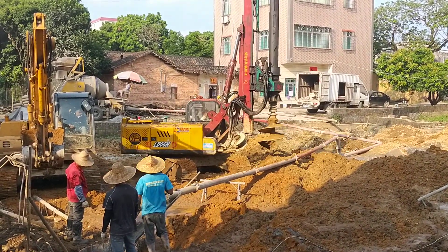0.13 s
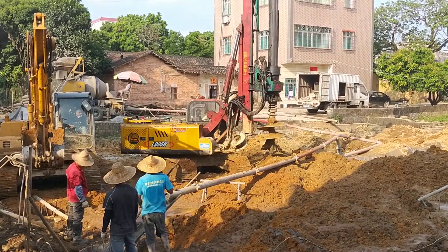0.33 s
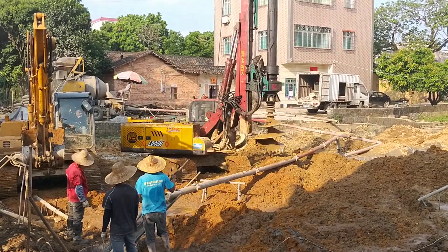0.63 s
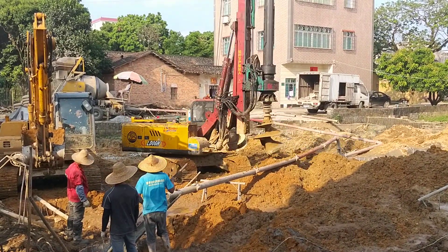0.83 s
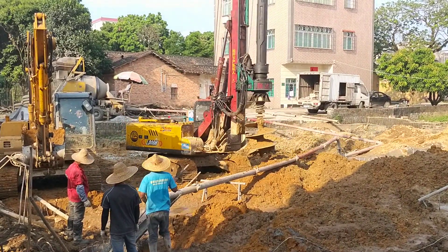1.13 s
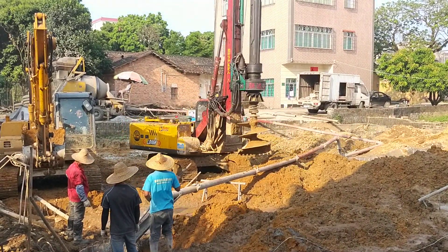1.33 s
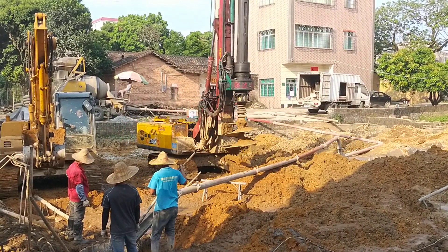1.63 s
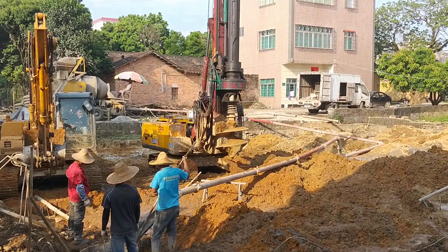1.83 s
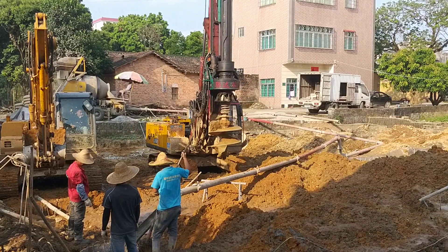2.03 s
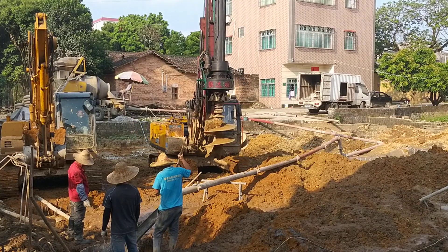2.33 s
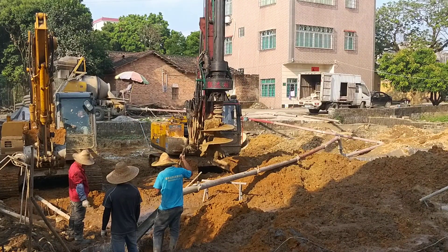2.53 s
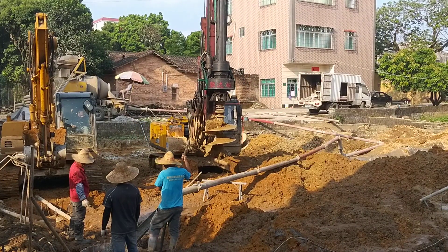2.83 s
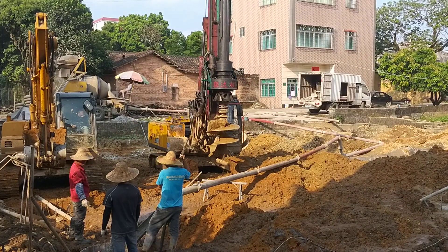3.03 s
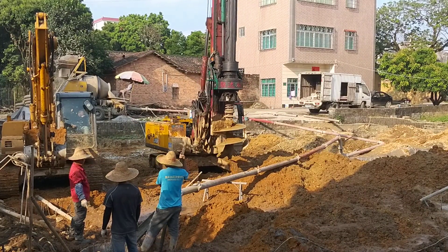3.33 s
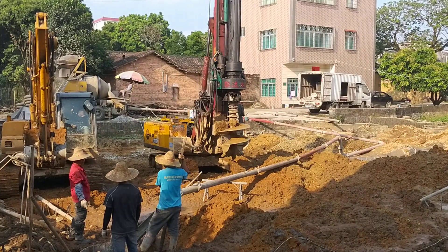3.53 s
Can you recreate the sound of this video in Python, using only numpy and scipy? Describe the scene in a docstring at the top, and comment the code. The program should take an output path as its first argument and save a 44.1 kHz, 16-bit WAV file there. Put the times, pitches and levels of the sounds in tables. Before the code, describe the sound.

Steady diesel rumble, pump hum and fan hiss of a turning drill rig outdoors, with early clatter and panel knocks, a calmer middle, then heavy clanks, grit crunches and low wind buffets at the microphone.

```python
"""Rotary drilling rig on a building site

A rig swings round on an open site. Diesel firings drive noise through the resonances of its housing,
and the pump hums in harmonics of the crank rate; exhaust, fan, engine bay and an idling machine join in.
Mast and drill string shudder, rattle and clank in bursts of filtered noise and decaying modes; a panel
knocks, fittings clink, paired sines make dull thumps and low buffets of wind, hydraulics groan,
steel squeaks, and grit crunches in clouds of grains.
"""
import sys
import numpy as np
from scipy import signal
from scipy.fft import rfft, irfft, next_fast_len
from scipy.io import wavfile

SR = 44100
rng = np.random.default_rng(int(sys.argv[2]) if len(sys.argv) > 2 else 0)


def master_out(mix):
    """Clip the mix to full scale and print it as 16-bit PCM to the path in sys.argv[1]."""
    frames = np.transpose(np.atleast_2d(mix))
    ceiling = np.clip(frames, -1, 1)
    pcm = np.round(ceiling * 32767).astype(np.int16)
    wavfile.write(sys.argv[1], SR, pcm)


N = 163170
T = np.arange(N) / SR


def from_db(db):
    """Logarithmic level: decibels to amplitude gain."""
    return 10 ** (np.asarray(db) / 20)


def rms_one(x):
    """Normalisation: scale to unit rms."""
    return x / np.sqrt(np.mean(x ** 2) + 1e-20)


def pan(db):
    """Interaural level difference: left and right gains for left minus right in dB."""
    return from_db(np.array([[db], [-db]]) / 2)


def level(rows):
    """Amplitude envelope: gain interpolated in dB between (t/s, level/dB) points."""
    return from_db(np.interp(T, *np.transpose(rows)))


def at_hz(points, hz):
    """Spectral interpolation: read a table on a log-frequency axis."""
    f, v = np.transpose(points)
    return np.interp(np.log(hz), np.log(f), v)


def drift(rate):
    """Low-passed random process: unit-rms wander with its corner near rate in Hz."""
    step = 40  # samples between the points of the wander
    r = np.exp(-2 * np.pi * rate * step / SR)
    settle = 2000
    noise = rng.standard_normal(N // step + settle + 2)
    slow = signal.lfilter([1], [1, -2 * r, r * r], noise)[settle:]
    return np.interp(np.arange(N) / step, np.arange(len(slow)), rms_one(slow))


def band(x, low, high):
    """Band-pass filtering with Butterworth slopes."""
    edges = [max(low, 10), min(high, SR / 2 - 100)]
    return signal.sosfilt(signal.butter(2, edges, "band", fs=SR, output="sos"), x)


def around(x, hz, width):
    """Band-pass filtering about a centre, width in Hz."""
    return band(x, hz - width / 2, hz + width / 2)


def stereo(pair, alike):
    """Interchannel correlation: mix two unrelated signals as sum and difference."""
    c = np.clip(alike, -.99, .99)
    return np.sqrt(1 + c) * pair[0] + np.sqrt(1 - c) * pair[1] * np.array([[1], [-1]])


# left-right likeness of the site's sound: (f/Hz, correlation)
LIKENESS = [(50, 0.93), (200, 0.97), (500, 0.95), (1000, 0.72), (2000, 0.43), (4000, -0.25), (8000, 0.01),
            (15000, -0.16)]


def likeness(hz):
    """Spatial coherence: left-right correlation as a function of frequency."""
    return at_hz(LIKENESS, hz)


def coloured(spectrum, excitation=1, patchy_db=0):
    """Subtractive synthesis: enveloped noise through a bank of flickering bands; rms 1."""
    edges = np.geomspace(spectrum[0][0], spectrum[-1][0], 2 * len(spectrum) + 1)
    white = rng.standard_normal((2, 2, N)) * excitation
    out = 0
    for k, (low, high) in enumerate(zip(edges, edges[1:])):
        hz = np.sqrt(low * high)
        gain = from_db(at_hz(spectrum, hz) + patchy_db * drift(15.4))
        # neighbouring bands draw on different noise
        out = out + gain * stereo(band(white[k % 2], low, high), likeness(hz))
    return rms_one(out)


def contacts(per_s, spread_db, decay_s):
    """Shot noise: amplitude envelope of random contacts whose powers add."""
    strength = from_db(spread_db * np.minimum(rng.exponential(1, N), 3))
    hits = (rng.random(N) < per_s / SR) * strength
    power = signal.lfilter([1], [1, -np.exp(-2 / (decay_s * SR))], hits ** 2 + 1e-12)
    return np.sqrt(rms_one(power))


def bursts(rows, attack_s, release_s):
    """Energy addition of envelopes: linear attack, hold counted from the start, exponential release."""
    power = 0
    for s, hold, db in rows:
        attack = np.clip((T - s) / attack_s, 0, 1)
        release = np.exp(-np.maximum(T - s - hold, 0) / release_s)
        power = power + (from_db(db) * attack * release) ** 2
    return np.sqrt(power)


def blow(s, db, decay_s):
    """Impulsive excitation: sudden onset and exponential decay."""
    return from_db(db) * (T >= s) * np.exp(-np.maximum(T - s, 0) / decay_s)


def ring(x, hz, t60):
    """Damped resonance: one steel mode, a two-pole filter driven by x."""
    r = np.exp(-np.log(1000) / (t60 * SR))
    w = 2 * np.pi * hz / SR
    edge = np.sqrt(1 - r)
    return signal.lfilter([edge, 0, -edge], [1, -2 * r * np.cos(w), r * r], x + 1e-12)


CRANK_HZ, FIRINGS_PER_TURN, SPEED_WOBBLE = 35.3, 3, 0.00299  # mean rate; wobble as a fraction, rms
FIRING_DECAY_S, FIRING_SPREAD_DB, STEADY_SHARE = 0.026, 0.5, 0.8  # share beside pulses of rms 1
# relative strength of the firings in turn: (level/dB)
CYLINDERS_DB = [-1, -0.6, -2.3, -3.6, -2.5, -2.5]


def combustion():
    """Periodic excitation: crank turns so far, and the pulse envelope of the firings."""
    turns = np.cumsum(CRANK_HZ * (1 + SPEED_WOBBLE * drift(2.4))) / SR
    firing = turns * FIRINGS_PER_TURN
    k = firing.astype(int)
    spread = FIRING_SPREAD_DB * rng.standard_normal(N)[k]
    strength = from_db(np.take(CYLINDERS_DB, k, mode="wrap") + spread)
    decay = np.exp(-(firing % 1) / (CRANK_HZ * FIRINGS_PER_TURN * FIRING_DECAY_S))
    return turns, STEADY_SHARE + rms_one(strength * decay)


TURN_MID_S, TURN_TIME_S = 2.26, 0.72


def turning():
    """Directivity weight: a smooth step from -1/2 to 1/2 as the rig turns."""
    return np.tanh((T - TURN_MID_S) / TURN_TIME_S) / 2


HOUSING_FLICKER_DB, HOUSING_FLICKER_HZ = .8, 26
# housing resonances: (f/Hz, width/Hz, relative level/dB, left-right correlation, change over the turn/dB)
HOUSING = [(326, 102, -35.5, 0.87, 0), (568, 110, -36, 0.7, -0.5), (646, 62, -42, 0.6, 1.5),
           (705.4, 71, -35.5, 0.75, -5), (1010, 98, -34, 0.62, 0.5), (1533, 210, -34, 0.3, 1),
           (2002, 225, -38, 0.34, -2.5), (2545, 170, -41, 0.1, -2.5), (3100, 360, -45, 0, -2)]
# level of the engine's drone: (t/s, relative level/dB)
DRONE = [(0, 2), (.9, -0.5), (1.4, 1), (1.9, 2), (2.2, 3.5), (2.39, 1.5), (2.55, 4), (2.85, 0.5), (3.3, 4),
         (3.7, 2.5)]


def housing(puffs):
    """Forced resonance: the firings' noise drives the modes of the engine housing."""
    turned = turning()
    out = 0
    for hz, width, db, alike, change in HOUSING:
        noise = around(rng.standard_normal((2, N)) * puffs, hz, width)
        out = out + from_db(db + change * turned) * rms_one(stereo(noise, alike))
    return level(DRONE) * from_db(HOUSING_FLICKER_DB * drift(HOUSING_FLICKER_HZ)) * out


TONE_WAVER_DB, TONE_WAVER_HZ = 1.6, 4
# orders of the pump's hum: (multiple of the crank rate, mean level/dB, change over the turn/dB)
ORDERS = [(1, -46.5, 1), (2, -46, 1), (3, -50.5, 4), (12, -41.5, 8), (18, -35, -0.5)]


def pump_hum(turns):
    """Harmonic series: the pump's tones lock to multiples of the crank rate."""
    turned = turning()
    out = 0
    for order, db, change in ORDERS:
        tone = rms_one(np.sin(2 * np.pi * (order * turns + rng.random())))
        out = out + from_db(db + change * turned + TONE_WAVER_DB * drift(TONE_WAVER_HZ)) * tone
    return out


EXHAUST_DB, EXHAUST_FLICKER_DB, EXHAUST_FLICKER_HZ = 0.5, 0.5, 6  # first is added to the table's level
# level of the exhaust's rumble: (t/s, relative level/dB)
RUMBLE = [(0.0, -41), (0.3, -42), (1.45, -42), (1.62, -33.5), (1.85, -55), (2.01, -31), (2.2, -33.5),
          (2.6, -35.5), (3.0, -30.5), (3.7, -29.5)]
# its spectrum: (f/Hz, relative level per Hz/dB)
EXHAUST = [(30, -18), (39, -13), (50, 6.5), (74, 6), (110, -3), (170, -7.5), (300, -33), (600, -35)]


def exhaust(puffs):
    """Pulsed-flow noise: each firing swells a low rumble."""
    flicker = from_db(EXHAUST_DB + EXHAUST_FLICKER_DB * drift(EXHAUST_FLICKER_HZ))
    return flicker * level(RUMBLE) * coloured(EXHAUST, puffs, patchy_db=4.0)


# level of the low roar from the engine bay as it swings round: (t/s, level/dB)
ROAR_LEVEL = [(0, -44), (.55, -37.5), (1.0, -34), (1.4, -47.5), (1.65, -41), (1.85, -41), (2.15, -34),
              (2.4, -41.5), (2.55, -34), (2.85, -43.5), (3.3, -36.5), (3.7, -26.5)]
# its spectrum: (f/Hz, relative level per Hz/dB)
ROAR = [(95, 7), (150, 1), (200, 10), (280, 4.5), (380, -3.5), (460, 2.5), (560, 6.5), (800, 10.5)]


def roar(puffs):
    """Amplitude-modulated noise: the engine bay roars low in time with the firings."""
    return level(ROAR_LEVEL) * coloured(ROAR, puffs, patchy_db=5.0)


FAN_DB, FAN_STEADY_SHARE = -36.5, 5.3  # base level; steady part added to the firing envelope
# level of the fan's hiss: (t/s, level above base/dB)
FAN_SWELL = [(0, 6), (.65, 1.5), (1.1, 2.5), (1.7, 1), (2.3, 4), (2.9, 5), (3.7, 3)]
# its spectrum: (f/Hz, relative level per Hz/dB)
FAN = [(100, -1), (250, -17), (480, -10.5), (850, -26), (1200, -4.5), (2300, -8), (3600, -7), (5300, -6.5),
       (6500, -14.5), (8100, -55), (9700, -17.5), (12000, -39), (15500, -19.5)]


def fan(puffs):
    """Broadband flow noise: a mostly steady hiss, lightly modulated by the firings."""
    return from_db(FAN_DB) * level(FAN_SWELL) * coloured(FAN, FAN_STEADY_SHARE + puffs, patchy_db=2.0)


def engine():
    """Superposition: one crank drives housing, pump, exhaust, engine bay and fan."""
    turns, puffs = combustion()
    return housing(puffs) + pump_hum(turns) + exhaust(puffs) + roar(puffs) + fan(puffs)


TAPPETS_DB, TAPPET_LOW_HZ, TAPPET_HIGH_HZ = -45.5, 3900, 5100
TAPPETS_PER_S, TAPPET_SPREAD_DB, TAPPET_DECAY_S = 140, 2.5, .003


def tappets():
    """Band-limited shot noise: fine, random ticking of the valve gear."""
    ticks = rng.standard_normal((2, N)) * contacts(TAPPETS_PER_S, TAPPET_SPREAD_DB, TAPPET_DECAY_S)
    return from_db(TAPPETS_DB) * rms_one(band(ticks, TAPPET_LOW_HZ, TAPPET_HIGH_HZ))


# a second machine idles nearby: (f/Hz, level/dB)
IDLER = [(80.7, -51)]


def idler():
    """Pure tone with phase wander: the second machine's low drone."""
    return sum(from_db(db) * rms_one(np.sin(2 * np.pi * hz * T + drift(1.0))) for hz, db in IDLER)


SHUDDER_ATTACK_S, SHUDDER_RELEASE_S = 0.0052, 0.049
# mast and drill string shudder: (start t/s, hold/s, level/dB, centre f/Hz, width/octaves)
SHUDDERS = [(-.03, 0.28, -23, 260, 1.55), (0.225, 0.11, -28.5, 228, 0.62), (.455, 0.039, -30, 286, 0.78),
            (0.662, 0.047, -27, 264, 0.99), (0.764, 0.09, -27, 270, 0.8), (1.972, 0.063, -24.5, 190, 2.7),
            (2.019, 0.09, -24.5, 200, 3.1), (2.08, 0.1, -25.5, 527, 1.2), (2.452, 0.091, -34, 387, 1.5),
            (3.056, 0.11, -26.5, 424, 0.68), (3.162, 0.12, -24, 360, 1.9), (3.37, 0.33, -33, 422, 0.88),
            (3.5, 0.11, -33, 110, 3.4)]


def shudders():
    """Band-limited impact noise: heavy steel judders, each time in a register of its own."""
    out = 0
    for s, hold, db, hz, octaves in SHUDDERS:
        judder = rng.standard_normal((2, N)) * contacts(per_s=300, spread_db=1.5, decay_s=0.0088)
        half = 2 ** (octaves / 2)
        body = rms_one(stereo(band(judder, hz / half, hz * half), likeness(hz)))
        out = out + bursts([(s, hold, db)], SHUDDER_ATTACK_S, SHUDDER_RELEASE_S) * body
    return out


JINGLE_LOW_HZ, JINGLE_HIGH_HZ, JINGLES_PER_S, JINGLE_T60_S = 2184, 7390, 450, .03


def jingle(count=28):
    """Modal synthesis: small steel parts struck at random, each with its own pitch; rms 1."""
    struck = rng.random(N) < JINGLES_PER_S / SR
    part = rng.integers(0, count, N)
    clicks = struck * rng.standard_normal((2, N))
    pitches = np.geomspace(JINGLE_LOW_HZ, JINGLE_HIGH_HZ, count)
    return rms_one(sum(ring(clicks * (part == k), hz, JINGLE_T60_S) for k, hz in enumerate(pitches)))


RATTLE_ATTACK_S, RATTLE_RELEASE_S, CLANK_CHATTER_S = .022, 0.074, 0.026
RATTLE_PAN_DB, RATTLE_RING_DB, JINGLE_DB = -1.5, -2.5, -11  # ring and jingle relative to the rattle
# loose steel rattles: (start t/s, hold/s, relative level/dB)
RATTLES = [(-.03, 0.19, -23), (.15, 0.047, -28), (.2, 0.023, -29.5), (.785, 0.06, -29.5), (2.06, 0.04, -29),
           (2.13, 0.054, -42), (2.665, 0.03, -37), (3.14, 0.078, -31.5), (3.395, 0.026, -29),
           (3.515, 0.05, -28.5)]
# spectrum of the loose steel: (f/Hz, relative level per Hz/dB)
RATTLE = [(150, -1), (300, 3), (600, -6.5), (1200, 0), (2000, -1), (3000, 0.5), (4100, -28), (5600, 4.5),
          (7300, 3.5), (8500, -15.5), (11000, -24), (15500, -16)]
# hard knocks of the drill string: (t/s, driving level/dB)
CLANKS = [(0.051, -41), (.166, -31), (0.801, -28), (2.075, -27), (2.095, -42), (3.185, -34), (3.222, -43),
          (3.412, -32)]
# modes of the drill string: (f/Hz, relative level/dB, t60/s)
STEEL = [(541, 2.5, 0.044), (736, -11, 0.059), (913, 0.5, 0.12), (947, -1, 0.029), (1364, -2.5, 0.07),
         (1895, 0.5, 0.048), (2577, -9.5, 0.15), (2730, 0, 0.078), (3162, -7, 0.074), (3626, 1.5, 0.063),
         (4480, -5.5, 0.028), (5216, -5.5, 0.02), (5400, -40, 0.066), (5680, -3.5, 0.063)]


def drill_string():
    """Modal excitation: small contacts and hard knocks ring the steel's modes; small parts jingle."""
    chatter = contacts(per_s=510, spread_db=6.5, decay_s=0.018)
    effort = bursts(RATTLES, RATTLE_ATTACK_S, RATTLE_RELEASE_S)
    knocks = sum(blow(s, db, CLANK_CHATTER_S) for s, db in CLANKS)
    force = from_db(RATTLE_RING_DB) * effort * chatter + knocks
    total = np.sqrt(sum(from_db(db) ** 2 for _, db, _ in STEEL))
    modes = 0
    for hz, db, t60 in STEEL:
        mode = ring(rng.standard_normal((2, N)) * force, hz, t60)
        modes = modes + from_db(db) / total * stereo(mode, likeness(hz))
    loose = coloured(RATTLE, chatter, patchy_db=0.5) + from_db(JINGLE_DB) * jingle()
    return (modes + effort * loose) * pan(RATTLE_PAN_DB)


CRUNCH_ATTACK_S, CRUNCH_RELEASE_S, CRUNCH_PAN_DB = .018, 0.046, 2.5
GRAINS_PER_S, GRAIN_SPREAD_DB, GRAIN_DECAY_S = 700, 3, .0015
# sharp cracks: (t/s, level/dB, decay/s, left minus right/dB)
CRACKS = [(0.055, -14, 0.015, 8), (.169, -22, 0.019, 10), (.24, -27, 0.0092, 4), (.803, -23, 0.006, 9),
          (.813, -28, 0.0068, 8), (.872, -25, .005, 2), (0.924, -18.5, 0.0074, -4), (2.08, -29, 0.018, -10),
          (2.172, -19.5, 0.008, -3), (2.457, -21.5, 0.0041, -8), (2.477, -21, 0.0046, -4),
          (3.527, -16.5, 0.016, -5)]
# grit crunches: (start t/s, hold/s, level/dB)
CRUNCHES = [(.43, 0.046, -33.5), (.86, 0.14, -36.5), (2.17, 0.039, -32), (2.41, 0.051, -26),
            (2.445, 0.077, -29), (2.52, 0.18, -35.5), (3.15, 0.075, -30), (3.53, 0.034, -38)]
# spectrum of both: (f/Hz, relative level per Hz/dB)
GRIT = [(1200, 8.5), (3000, -5), (4500, 4.5), (5600, 9.5), (7300, 6.5), (8400, -29), (10000, -16),
        (15500, -24)]


def grit():
    """Granular noise: single sharp cracks, and bright crunches made of many grains."""
    cracks = sum(blow(s, db, decay) * pan(side) for s, db, decay, side in CRACKS) * coloured(GRIT)
    grains = coloured(GRIT, contacts(GRAINS_PER_S, GRAIN_SPREAD_DB, GRAIN_DECAY_S))
    crunch = bursts(CRUNCHES, CRUNCH_ATTACK_S, CRUNCH_RELEASE_S) * grains
    return crunch * pan(CRUNCH_PAN_DB) + cracks


CLINK_DECAY_S, CLINK_WIDTH_HZ = 0.019, 370
# loose fittings clink: (t/s, level/dB, centre f/Hz)
CLINKS = [(.089, -30, 3100), (.18, -36, 3670), (.214, -27, 6940), (.435, -51, 5400), (.477, -32, 5470),
          (.816, -28.5, 3230), (1.119, -32, 4350), (2.681, -25.5, 4540), (2.79, -29.5, 4440),
          (2.81, -31, 5430), (3.151, -27, 5270), (3.487, -31, 4900)]


def clinks():
    """Narrow-band decay: each fitting rings briefly, a noise band standing for close modes."""
    out = 0
    for s, db, hz in CLINKS:
        cluster = rms_one(around(rng.standard_normal((2, N)), hz, CLINK_WIDTH_HZ))
        out = out + blow(s, db, CLINK_DECAY_S) * cluster
    return out


PANEL_HZ, PANEL_DETUNE, PANEL_ATTACK_S, PANEL_DECAY_S = 660, 0.049, 0.0092, 0.0085  # detune: largest fraction
# a loose panel on the housing knocks: (t/s, level/dB)
PANEL_KNOCKS = [(0.226, -22), (0.276, -20.5), (0.331, -20.5), (0.692, -21.5), (0.869, -23), (0.925, -22),
                (0.963, -23), (1.028, -25), (1.093, -24), (1.324, -27), (1.346, -24), (1.389, -23),
                (1.871, -32)]


def panel():
    """Damped free vibration: each knock rings a steel panel, slightly detuned each time."""
    out = 0
    for s, db in PANEL_KNOCKS:
        detune, turn = rng.uniform(-1, 1, 2)
        tone = np.sin(2 * np.pi * PANEL_HZ * (1 + PANEL_DETUNE * detune) * T + np.pi * turn)
        out = out + bursts([(s, PANEL_ATTACK_S, db)], PANEL_ATTACK_S, PANEL_DECAY_S) * rms_one(tone)
    return out


THUMP_ATTACK_S, THUMP_OVERTONE, THUMP_OVERTONE_DB = 0.0038, 1.35, -6  # overtone as a pitch ratio
# dull thumps, and low buffets of wind: (t/s, level/dB, f/Hz, decay/s)
THUMPS = [(0.235, -26, 250, 0.01), (.69, -23, 292, 0.015), (.783, -20, 297, .012), (1.971, -25, 96, 0.022),
          (2.027, -17.5, 162, 0.013), (2.052, -18, 232, 0.013), (2.088, -26, 75, .018),
          (2.317, -27.5, 213, .012), (2.674, -20.5, 240, 0.023), (2.59, -27, 80, .014),
          (2.83, -23, 120, 0.016), (2.89, -23, 101, .01), (3.005, -26, 90, 0.011), (3.28, -20, 101, 0.0077),
          (3.411, -18, 85, .02), (3.52, -20.5, 117, 0.0074)]


def thumps_and_buffets():
    """Inharmonic partials: two low sines swell and die quickly in each thump or buffet of wind."""
    out = 0
    for s, db, hz, decay_s in THUMPS:
        phase = 2 * np.pi * hz * (T - s)
        overtone = from_db(THUMP_OVERTONE_DB) * np.sin(THUMP_OVERTONE * phase)
        envelope = bursts([(s, THUMP_ATTACK_S, db)], THUMP_ATTACK_S, decay_s)
        out = out + envelope * rms_one(np.sin(phase) + overtone)
    return out


GROAN_WANDER, GROAN_WANDER_HZ = 0.029, 56  # pitch wander as a fraction, rms
GROAN_ATTACK_S, GROAN_RELEASE_S = 0.02, 0.016
# the hydraulics groan under load: (start t/s, hold/s, level/dB, mean f/Hz)
GROANS = [(0.604, 0.17, -35.5, 1112), (0.793, .05, -34.5, 1043), (2.59, 0.168, -32.5, 1045),
          (3.146, .11, -30, 960)]


def groans():
    """Random frequency and amplitude modulation: rough tones of oil forced through a valve."""
    phase = 2 * np.pi * np.cumsum(1 + GROAN_WANDER * drift(GROAN_WANDER_HZ)) / SR  # for a pitch of 1 Hz
    out = 0
    for s, hold, db, hz in GROANS:
        rough = rms_one(np.sin(hz * phase) * from_db(3.6 * drift(47)))
        out = out + bursts([(s, hold, db)], GROAN_ATTACK_S, GROAN_RELEASE_S) * rough
    return out


SQUEAK_HZ, SQUEAK_WANDER = 3220, .007  # mean pitch; wander as a fraction, rms
SQUEAK_ATTACK_S, SQUEAK_RELEASE_S = 0.0029, 0.0091
# the drill string squeaks in its guide: (start t/s, hold/s, level/dB)
SQUEAKS = [(2.078, 0.015, -25), (3.19, 0.045, -32.5), (3.411, 0.0084, -24.5)]


def squeaks():
    """Friction tone: steel slips on steel, a short sine of unsteady frequency."""
    phase = 2 * np.pi * np.cumsum(SQUEAK_HZ * (1 + SQUEAK_WANDER * drift(120.0))) / SR
    return bursts(SQUEAKS, SQUEAK_ATTACK_S, SQUEAK_RELEASE_S) * rms_one(np.sin(phase)) * pan(db=-3)


def scene():
    """Linear superposition: the whole site."""
    running = engine() + tappets() + idler()
    steel = shudders() + drill_string() + clinks() + panel() + squeaks()
    return running + steel + thumps_and_buffets() + grit() + groans()


CUTOFF_HZ = 15750
# overall tone and left-right balance by frequency: (f/Hz, level/dB, left minus right/dB)
TONE_BALANCE = [(60, -3, 1.5), (134, 1.5, 6), (222, 1.5, -2.5), (435, 0, 7.5), (740, -0.5, 0.5),
                (1080, -2, 3), (1170, 1.5, 7), (1270, -1.5, 0), (1810, -1, 5), (2230, 3, -1),
                (2770, -0.5, 3), (3030, 2, 4.5), (3580, 0, 6), (4300, -1.5, -21.5), (5400, -1.5, -13),
                (6560, -5, 3), (7640, 1, 23), (7740, -10, -5), (9350, 2, 19), (10700, 1.5, 18),
                (13000, 1.5, 6.5), (15500, -0.5, -5)]


def record(dry):
    """Linear filtering: an equaliser shapes level and left-right balance by frequency; the top is cut."""
    size = next_fast_len(N + SR // 10)
    log_hz = np.log(np.maximum(np.arange(size // 2 + 1) * SR / size, 1))
    hz, *columns = np.transpose(TONE_BALANCE)
    db, balance_db = (np.interp(log_hz, np.log(hz), c) for c in columns)
    sides = from_db(np.array([balance_db, -balance_db]) / 2)
    sides = sides / np.sqrt(np.mean(sides ** 2, axis=0))  # mean square gain of the two sides is 1
    shaped = irfft(rfft(dry, size) * from_db(db) * sides, size)[:, :N]
    return signal.sosfilt(signal.ellip(12, .1, 80, CUTOFF_HZ, fs=SR, output="sos"), shaped)


dry = scene()
out = record(dry)
master_out(out)
```